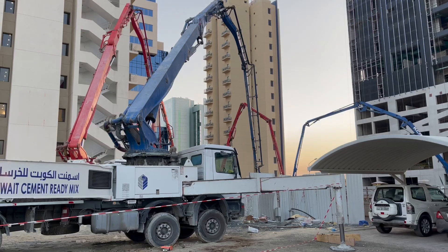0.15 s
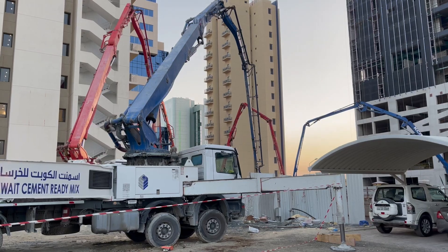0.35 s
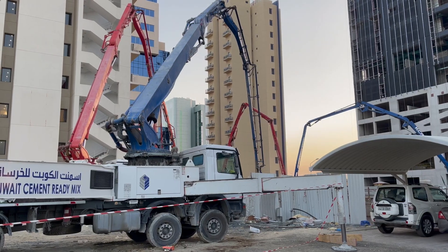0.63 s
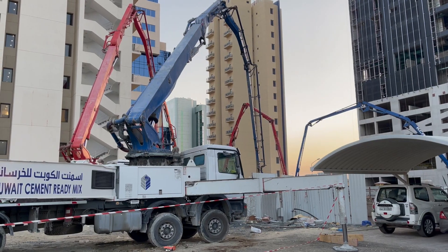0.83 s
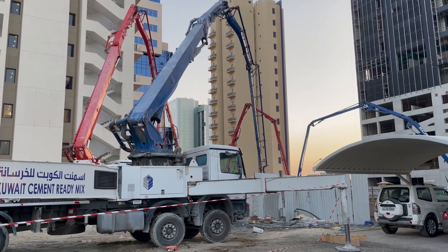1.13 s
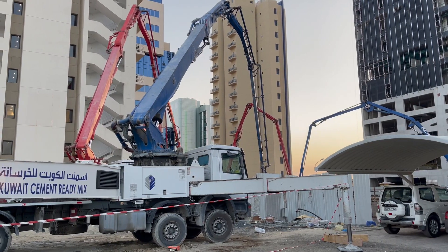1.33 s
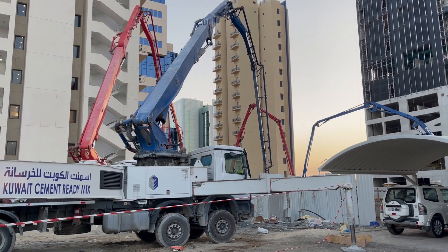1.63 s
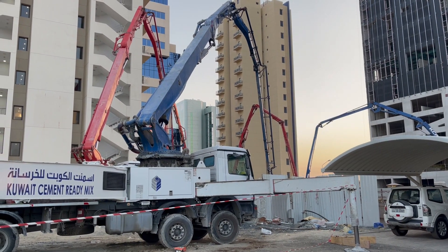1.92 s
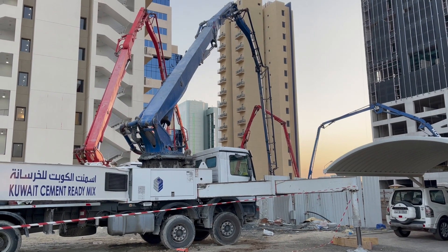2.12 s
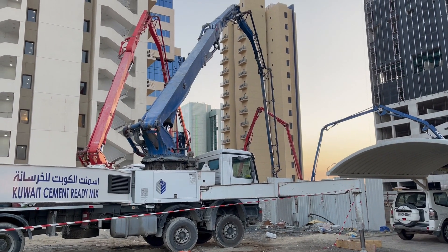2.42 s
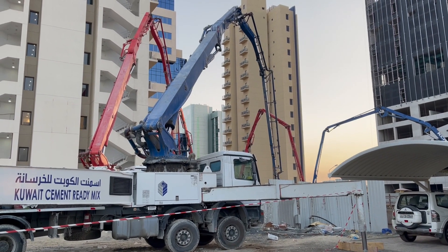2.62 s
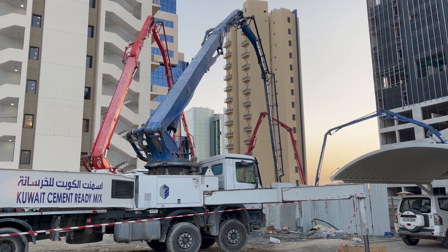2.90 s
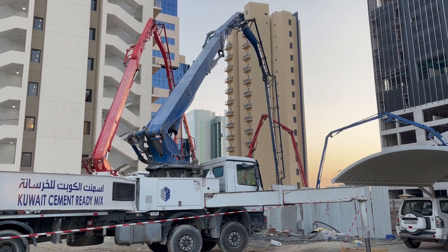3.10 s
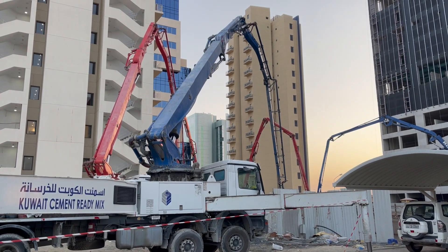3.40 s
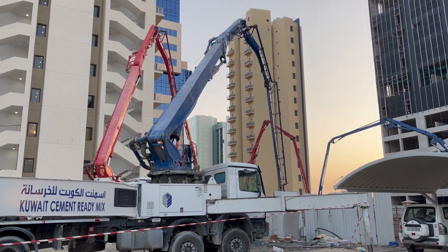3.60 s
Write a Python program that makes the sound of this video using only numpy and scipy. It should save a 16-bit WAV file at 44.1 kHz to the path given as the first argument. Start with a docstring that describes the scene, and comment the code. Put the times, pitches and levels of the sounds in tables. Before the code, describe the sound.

Low rumbling engine roar of concrete pump trucks, whining hydraulics, irregular thumps and one brief scraping clank.

```python
"""Concrete pumps among tower blocks

Several diesels drone and clatter: firing pulses ring pipe resonances and set off bursts of noise.
Hydraulic pumps whine as wavering tones; the near pump's noise hiss eases, then surges at each changeover.
The rumble heaves, dull thuds are short decaying tones with noise, and panels rattle as struck resonators.
A few scrapes and air spurts are bands of noise, one clank rings steel modes; a wide noise roar lies below."""
import sys
import numpy as np
from scipy import signal
from scipy.fft import rfft, irfft
from scipy.io import wavfile

SR = 44100
rng = np.random.default_rng(int(sys.argv[2]) if len(sys.argv) > 2 else 0)


def transcribe(signal):
    """Save signal, clipped to [-1, 1], as a 16-bit WAV file at the path in sys.argv[1]."""
    frames = np.atleast_2d(signal).T
    limited = np.clip(frames, -1, 1)
    pcm = np.round(limited * 32767).astype(np.int16)
    wavfile.write(sys.argv[1], SR, pcm)


N = 165375
T = np.arange(N) / SR  # time, s
FREQS = np.maximum(np.arange(N // 2 + 1) * SR / N, 1)  # spectrum bins, Hz
LEFT_RIGHT = np.array([[1], [-1]])  # opposite signs in the two channels
TICK_LIKENESS = 0.44  # left-right correlation of metal contacts

# Left-right correlation of the noise by frequency: f/Hz, correlation [-1 to 1]
LIKENESS = [(60, 0.87), (250, 0.88), (650, 0.86), (1100, 0.58), (1800, 0.092), (2900, 0.27), (4700, 0.69),
            (7500, 0.45), (8800, 0.84), (10100, -0.92), (11400, 0.43)]


def from_db(db):
    """Level to amplitude: 20 dB is a factor of ten."""
    return 10 ** (np.asarray(db) / 20)


def rms_one(x):
    """Normalisation to unit mean power over all channels."""
    return x / np.sqrt(np.mean(x ** 2) + 1e-20)


def per_hz(points):
    """Interpolation of a table, linear in log frequency, onto the spectrum bins."""
    hz, value = np.transpose(points)
    return np.interp(np.log(FREQS), np.log(hz), value)


def drift(rate_hz):
    """Low-passed random fluctuation of unit rms: two equal poles at rate_hz."""
    step = 40  # samples per slow value
    r = np.exp(-2 * np.pi * rate_hz * step / SR)
    settling = 2000
    white = rng.standard_normal(N // step + settling + 2)
    slow = signal.lfilter([1], [1, -2 * r, r * r], white)[settling:]
    return np.interp(np.arange(N) / step, np.arange(len(slow)), rms_one(slow))


def pair(alike):
    """Partial coherence: a shared mid and an opposed side give white stereo spectra."""
    mid, side = rfft(rng.standard_normal((2, N)))
    alike = np.clip(alike, -1, 1)
    return np.sqrt(1 + alike) * mid + np.sqrt(1 - alike) * side * LEFT_RIGHT


def noise(spectrum, pan_db=0):
    """Spectral shaping of partly coherent stereo noise; rms 1."""
    level_db = per_hz(spectrum) + pan_db * LEFT_RIGHT / 2
    return rms_one(irfft(pair(per_hz(LIKENESS)) * from_db(level_db), N))


def band(x, low_hz, high_hz):
    """Band-pass filtering with a Butterworth response."""
    high_hz = min(max(high_hz, low_hz + 10), SR / 2 - 10)
    sos = signal.butter(2, [low_hz, high_hz], "band", fs=SR, output="sos")
    return signal.sosfilt(sos, x + 1e-18)


def envelope(start, attack, hold, release):
    """Transient envelope: linear rise, hold, exponential decay (all in s)."""
    rise = np.clip((T - start) / attack, 0, 1)
    return rise * np.exp(-np.maximum(T - start - attack - hold, 0) / release)


def ring(drive, hz, width_hz):
    """Driven damped resonance: the bandwidth sets the decay; rms 1."""
    r = np.exp(-np.pi * width_hz / SR)
    poles = [1, -2 * r * np.cos(2 * np.pi * hz / SR), r * r]
    return rms_one(signal.lfilter([1, 0, -1], poles, drive + 1e-18))


def ticks(per_s):
    """Random impacts: chance instants, uneven strengths, partly coherent between the ears."""
    return (rng.random(N) < per_s / SR) * irfft(pair(TICK_LIKENESS), N)


def surge():
    """Amplitude modulation: the gain by which the low rumble heaves and settles."""
    # Heaves of the rumble: t/s, hold/s, level rise/dB
    heaves = [(0.082, .11, 4.5), (.57, 0.21, 3.5), (1.0, .18, 2.5), (1.69, .14, 1), (2.83, 0.28, 3),
              (3.2, 0.099, 2), (3.598, 0.088, 2)]
    attack_s, release_s = .025, 0.06
    return from_db(sum(db * envelope(s, attack_s, hold, release_s) for s, hold, db in heaves))


def diesel(firing_hz, exhaust_db, pipe_hz, clatter_db, count=6):
    """Pulse excitation: each firing drives the exhaust pipe, the block and a decaying clatter."""
    # Spectrum of the metal clatter: f/Hz, relative level per Hz/dB
    clatter_spectrum = [(200, 0), (600, -10), (1100, 1.5), (2200, -4.5), (2600, -11.5), (5000, -38),
                        (12000, -34)]
    speed_wander = .004  # rms fraction of the firing rate
    cylinder_db, firing_db = 1.5, 2.5  # rms spread between cylinders, between firings
    pipe_width_hz, muffler_hz, exhaust_spread = 27, 510, 0.21
    knock_s, block_ring_s, block_ring_db = 0.0091, 0.004, -2  # block level is relative to the clatter

    phase = np.cumsum(firing_hz * (1 + speed_wander * drift(1))) / SR + rng.random()
    firing = phase.astype(int)
    cylinder_level = cylinder_db * rng.standard_normal(count)[firing % count]
    strength = from_db(cylinder_level + firing_db * rng.standard_normal(N)[firing])
    pulses = strength * np.diff(firing, prepend=0)

    exhaust = band(ring(pulses, pipe_hz, pipe_width_hz), 11.0, muffler_hz)
    exhaust = exhaust * (1 + exhaust_spread * drift(10.0) * LEFT_RIGHT)

    metal = noise(clatter_spectrum)
    since_firing_s = (phase % 1) / firing_hz
    clatter = rms_one(metal * strength * np.exp(-since_firing_s / knock_s))
    block_response = metal * np.exp(-T / block_ring_s)
    block = rms_one(signal.fftconvolve(pulses[None], block_response, axes=1)[:, :N])
    mechanical = clatter + from_db(block_ring_db) * block
    return from_db(exhaust_db) * rms_one(exhaust) * surge() + from_db(clatter_db) * mechanical


def diesels():
    """Superposition of engines with unrelated firing rates."""
    # Diesels: firing f/Hz, exhaust level/dB, pipe resonance f/Hz, clatter level/dB
    engines = [(42.16, -34.5, 57, -38.5), (67.4, -30.5, 73.2, -40), (37.37, -33, 114, -47)]
    return sum(diesel(*engine) for engine in engines)


def pump():
    """Modulated flow noise: hiss eases as a stroke ends; changeover adds bright spray and rumble."""
    # Changeovers: t/s, spray level/dB, rumble level/dB, rumble rise/s, rumble hold/s
    changeovers = [(0.97, -37, -20.3, .03, .1), (3.448, -36, -20.3, .08, .07)]
    # Spectra of stroke hiss, spray and rumble: f/Hz, relative level per Hz/dB
    hiss_spectrum = [(1000, 7), (2600, -1), (3700, 1.5), (4300, -1), (5100, 1.5), (7000, -4), (8600, -1),
                     (10200, -9.5), (11300, -1.5), (12400, -26)]
    spray_spectrum = [(700, 10.5), (1600, 21), (3000, -5), (5000, 11.5), (8800, 7.5), (11200, 7),
                      (12500, -16)]
    rumble_spectrum = [(30, -26), (70, -3), (160, 3), (290, 5), (400, 1), (520, -6), (690, -2), (850, -7),
                       (1300, -16), (1630, -9), (2200, -20), (3000, -21.5), (8000, -60)]
    # Stereo balance of the hiss: f/Hz, left minus right level/dB
    hiss_balance = [(1500, -3.5), (3000, 15.5), (4600, 12), (6500, 9.5), (8500, 0.5), (12000, 0)]
    hiss_db, hiss_flicker_db, spray_flicker_db = -35.5, 1.24, 3.5  # flickers are rms
    ease_s, ease_db, recover_s = 0.31, -9.5, 0.051
    spray_attack_s, spray_hold_s, spray_release_s = 0.016, 0.22, 0.08
    rumble_delay_s, rumble_release_s = 0.0069, 0.12

    level_db, out = hiss_db + hiss_flicker_db * drift(13), 0
    spray, rumble = noise(spray_spectrum), noise(rumble_spectrum)
    for s, spray_db, rumble_db, rise, hold in changeovers:
        level_db = level_db + ease_db * np.interp(T, [s - ease_s, s, s + recover_s], [0, 1, 0])
        spray_gain = from_db(spray_db + spray_flicker_db * drift(55))
        out = out + spray * spray_gain * envelope(s, spray_attack_s, spray_hold_s, spray_release_s)
        rumble_shape = envelope(s + rumble_delay_s, rise, hold, rumble_release_s)
        out = out + rumble * from_db(rumble_db) * rumble_shape
    return out + from_db(level_db) * noise(hiss_spectrum, per_hz(hiss_balance))


def spits():
    """Turbulent jet noise: the switching valve lets out short bright spurts of air."""
    # Valve spurts: t/s, level/dB
    spurts = [(0.979, -39), (3.468, -41), (3.53, -38)]
    low_hz, high_hz, attack_s, decay_s = 6500, 12000, .002, 0.027
    air = rms_one(band(irfft(pair(per_hz(LIKENESS)), N), low_hz, high_hz))
    return air * sum(from_db(db) * envelope(s, attack_s, 0, decay_s) for s, db in spurts)


def whines():
    """Tonal radiation of pumps, gears and fans: pitch, level and interaural phase waver."""
    # Steady whines: f/Hz, level/dB
    tones = [(300, -44.5), (467.1, -51), (538.8, -37), (564.7, -36), (721, -42.5), (807.9, -42),
             (855, -47.5), (932.8, -50.5), (983, -47.5), (1053.4, -49), (1130.1, -42.5), (1201.4, -48),
             (1858.8, -56), (2272, -51.5), (3687, -55), (7525, -68)]
    pitch_wander, flutter_db, path_spread = 0.0028, 3.2, 0.29  # rms: fraction, dB, radians
    out = np.zeros((2, N))
    for hz, db in tones:
        phase = 2 * np.pi * np.cumsum(hz * (1 + pitch_wander * drift(3.16))) / SR
        paths = path_spread * drift(3.0) * LEFT_RIGHT
        flutter = from_db(flutter_db * drift(2.76))
        out += from_db(db) * rms_one(np.sin(phase + paths) * flutter)
    return out


def thuds():
    """Heavily damped oscillation: knocks die in a few cycles with a noise trail, over pattering bumps."""
    # Dull thuds: t/s, level/dB, centre f/Hz
    knocks = [(0.09, -12, 220), (0.096, -10, 110), (.125, -14, 120), (.113, -7, 342), (.204, -14, 231),
              (0.579, -14.5, 135), (0.621, -12, 95), (0.661, -17, 109), (.797, -11.5, 279),
              (1.017, -11.5, 150), (1.04, -9, 251), (1.064, -10, 330), (1.143, -19, 74.5),
              (1.488, -16, 110), (1.701, -10.5, 145), (1.784, -13, 166), (1.869, -12, 126),
              (1.909, -9, 310), (1.918, -16, 82), (2.363, -11, 90), (2.885, -13, 160), (2.966, -11.5, 70),
              (3.044, -15, 111), (3.095, -15, 251), (3.15, -14.5, 249), (3.215, -16, 137), (3.277, -16, 96),
              (3.42, -14, 90.5), (3.552, -15, 167), (3.607, -13.5, 68.5), (3.654, -19, 120)]
    attack_cycles, decay_cycles = 0.6, 1.1
    trail_db, trail_decay_s, trail_width = -10, 0.017, 1.68  # width: band edge over centre
    bumps_per_s, bumps_db, bump_low_hz, bump_high_hz = 220, -31.5, 83, 283
    bumps_follow = 1.57  # power of the surge gain

    clicks = (rng.random(N) < bumps_per_s / SR) * rng.standard_normal(N)
    bumps = rms_one(band(clicks, bump_low_hz, bump_high_hz))
    out = from_db(bumps_db) * bumps * surge() ** bumps_follow
    white = irfft(pair(0.51), N)
    for s, db, hz in knocks:
        attack_s = attack_cycles / hz
        knock = np.sin(2 * np.pi * hz * (T - s)) * envelope(s, attack_s, 0, decay_cycles / hz)
        trail = rms_one(band(white, hz / trail_width, hz * trail_width))
        trail = trail * envelope(s, attack_s, 0, trail_decay_s)
        out = out + from_db(db) * (knock + from_db(trail_db) * trail)
    return band(out, 45.6, 690)


def panels():
    """Random excitation of modes: loose panels buzz, each resonance swelling and fading by itself."""
    # Panel resonances: f/Hz, level/dB
    resonances = [(630, -41), (680, -38.5), (1000, -43), (1150, -41), (1630, -44.5), (1880, -44.5),
                  (2080, -45), (2250, -44.5)]
    ticks_per_s, width_hz, swell_db = 90, 38, 3.5  # swell is rms
    out = 0
    for hz, db in resonances:
        buzz = ring(ticks(ticks_per_s), hz, width_hz)
        out = out + from_db(db) * rms_one(buzz * from_db(swell_db * drift(3.7)))
    return out


def scrapes():
    """Friction noise: brief gritty rasps in narrow bands."""
    # Scrapes: t/s, level/dB, centre f/Hz, decay/s
    rasps = [(2.15, -26.5, 770, 0.11), (2.19, -36, 3600, 0.043), (2.29, -36, 3600, 0.046),
             (1.1, -37, 3720, 0.029), (3.59, -29, 4800, 0.02)]
    attack_s, width, alike, grit_db = 0.0069, 1.28, 0.57, 1.5  # width: band edge over centre
    grit = irfft(pair(alike), N) * from_db(grit_db * drift(72))
    out = 0
    for s, db, hz, decay in rasps:
        rasp = rms_one(band(grit, hz / width, hz * width))
        out = out + from_db(db) * rasp * envelope(s, attack_s, 0, decay)
    return out


def clank():
    """Modal ringing: a quick run of contacts excites all modes of a piece of steel."""
    # Steel modes: f/Hz, relative level/dB
    modes = [(996, -3), (1170, -1), (1450, -1.5), (1600, 3), (1780, 0), (2000, 0), (2120, -0.5),
             (2600, -10), (3130, -9), (3600, -9), (4960, -15)]
    start_s, attack_s, hold_s, release_s = 2.188, .022, 0.031, 0.024
    level_db, contacts_per_s, quality = -41, 600, 14  # quality: frequency over bandwidth
    contacts = rng.random(N) < contacts_per_s / SR
    contacts = contacts * envelope(start_s, attack_s, hold_s, release_s)
    out = 0
    for hz, db in modes:
        strikes = contacts * irfft(pair(TICK_LIKENESS), N)
        out = out + from_db(db) * ring(strikes, hz, hz / quality)
    return from_db(level_db) * rms_one(out)


def site_roar():
    """Superposed sources: the whole site merges into steady coloured noise."""
    # Spectrum of the roar: f/Hz, relative level per Hz/dB
    roar_spectrum = [(20, -35), (32, -22), (45, 0.5), (70, 1), (110, 0), (170, -4.5), (300, -8), (470, -9),
                     (550, -7.5), (600, -10.5), (690, -7), (860, -12.5), (1200, -13), (1450, -18),
                     (1900, -17.5), (2300, -19.5), (2450, -23), (4200, -30), (7000, -36.5), (11000, -38),
                     (12500, -44)]
    return from_db(-22.5) * noise(roar_spectrum)


def scene():
    """Superposition of all sources, with an interchannel phase lag on the right."""
    # Phase by which the left channel leads: f/Hz, phase/rad
    left_leads = [(60, 0.32), (700, 0), (2300, 0.29), (4000, 0.61), (8000, 0.53), (11000, 0)]
    machines = diesels() + pump() + spits() + whines()
    impacts = thuds() + panels() + scrapes() + clank()
    left, right = machines + impacts + site_roar()
    right = irfft(rfft(right) * np.exp(-1j * per_hz(left_leads)), N)
    return np.array([left, right])


def record(dry):
    """Band limiting: a trace of bass until the sound cuts in, and a steep elliptic low-pass."""
    start_s, cutoff_hz = .084, 12400
    lead_in = from_db(-69) * band(dry, 16, 144)
    opened = np.where(T < start_s, lead_in, dry)
    low_pass = signal.ellip(12, .1, 100, cutoff_hz, fs=SR, output="sos")
    return signal.sosfilt(low_pass, opened)


dry = scene()
out = record(dry)
transcribe(out)
```